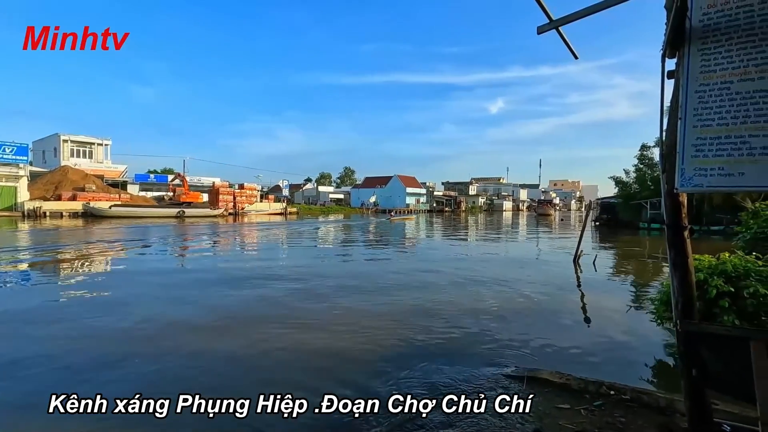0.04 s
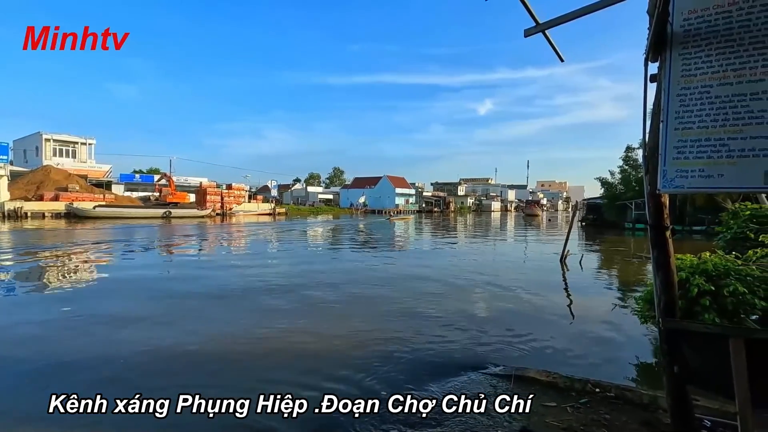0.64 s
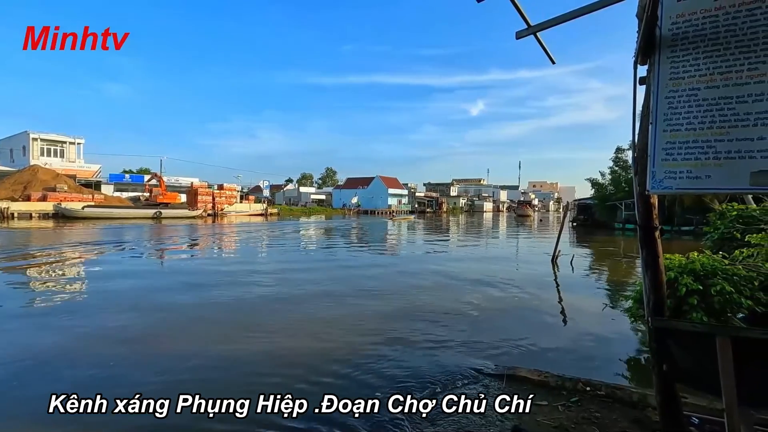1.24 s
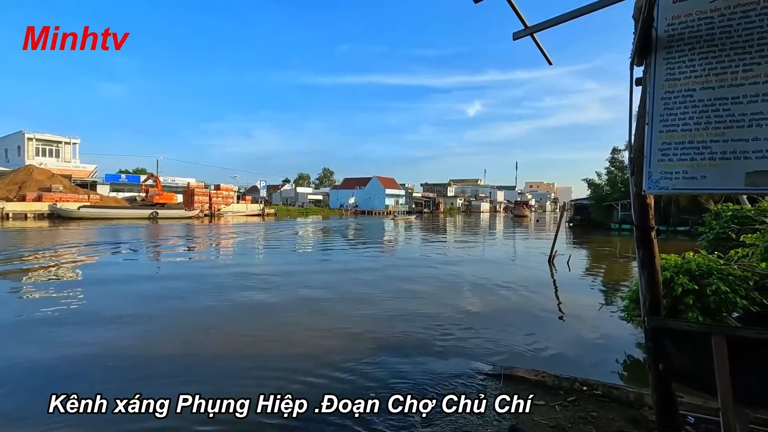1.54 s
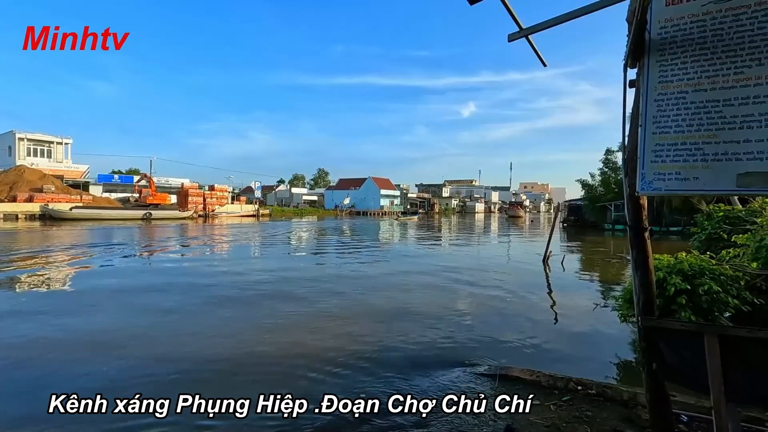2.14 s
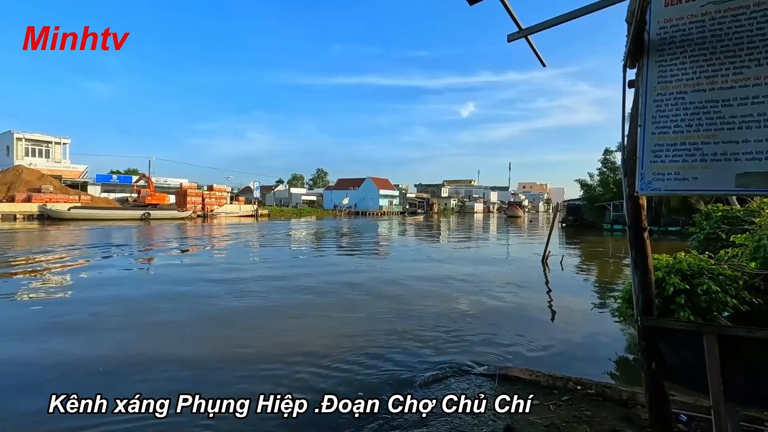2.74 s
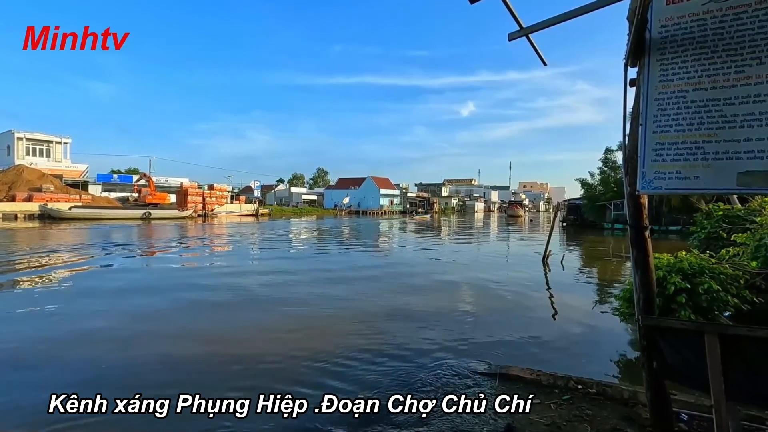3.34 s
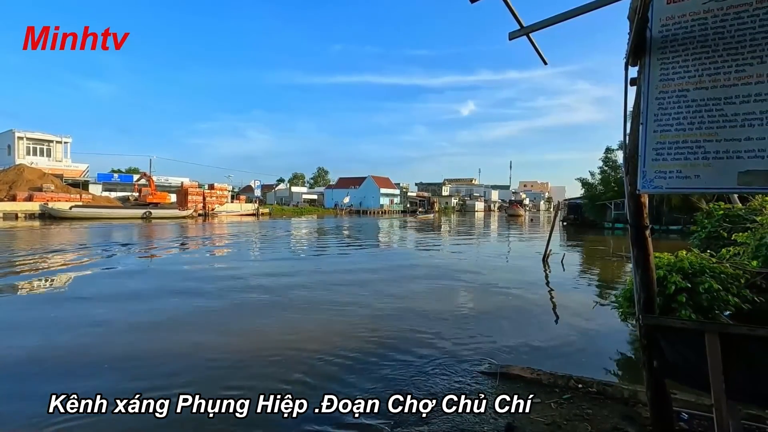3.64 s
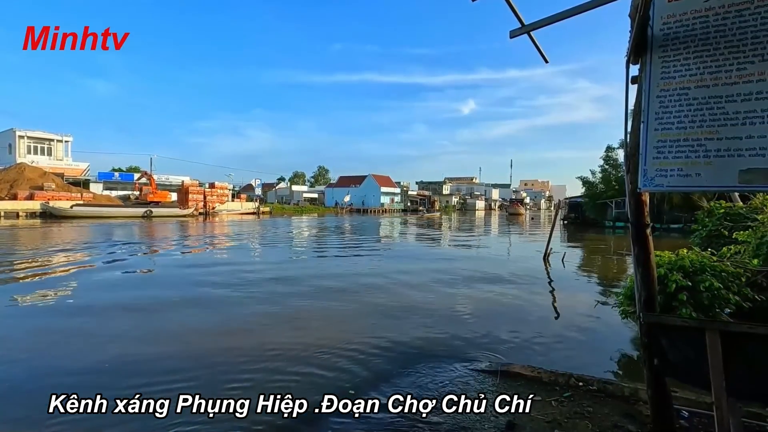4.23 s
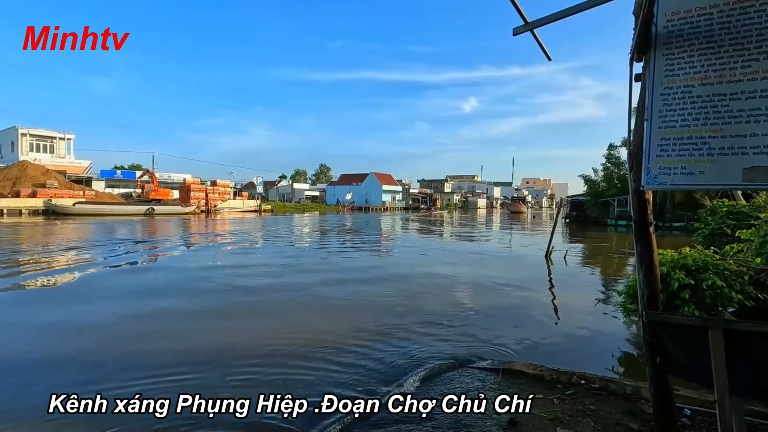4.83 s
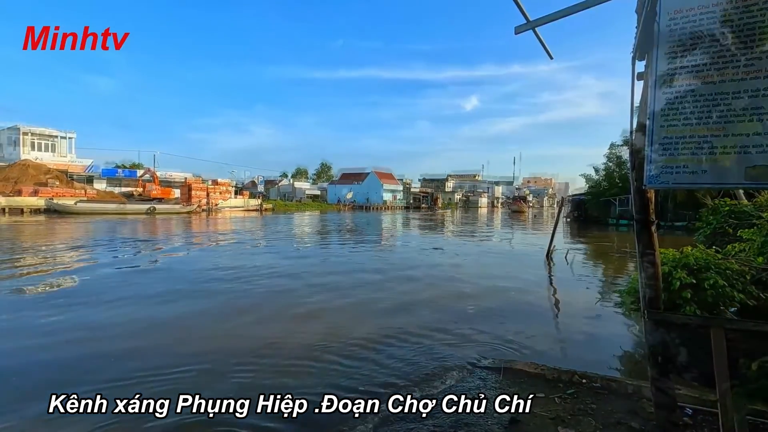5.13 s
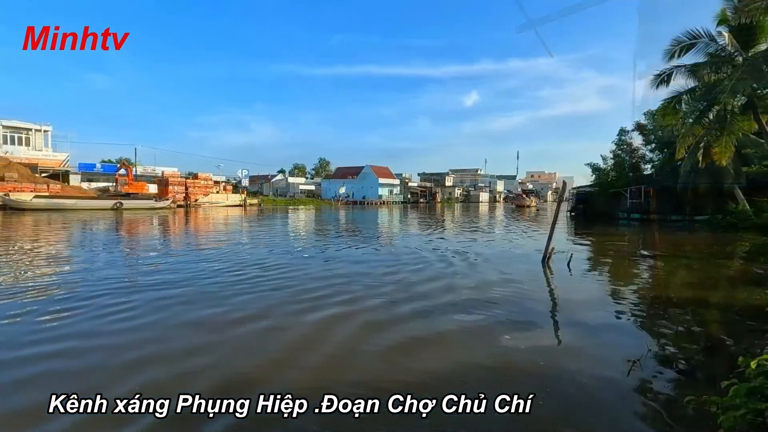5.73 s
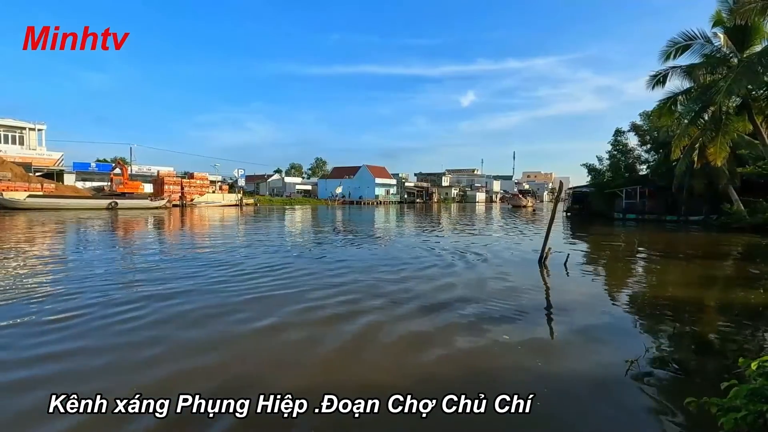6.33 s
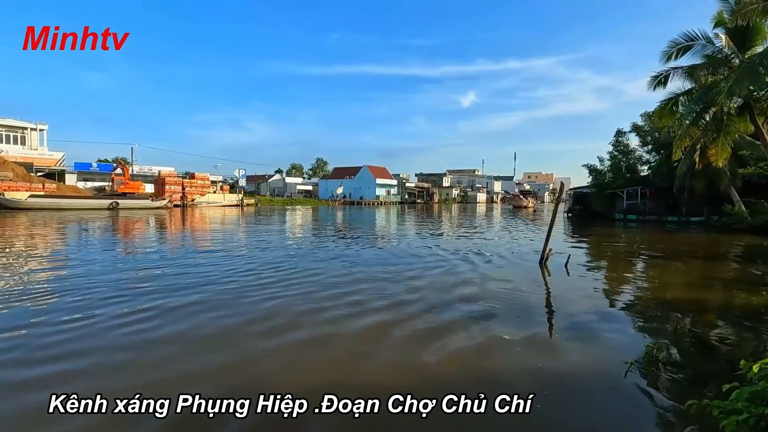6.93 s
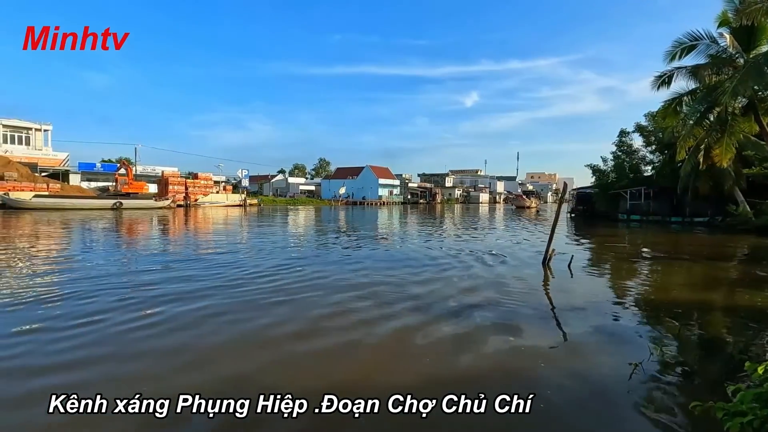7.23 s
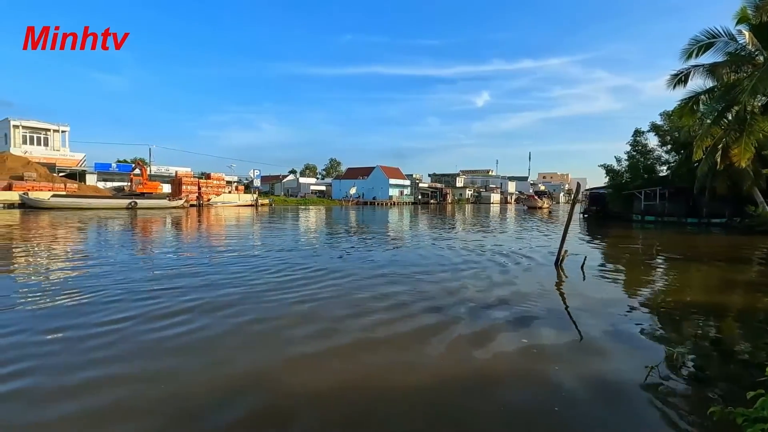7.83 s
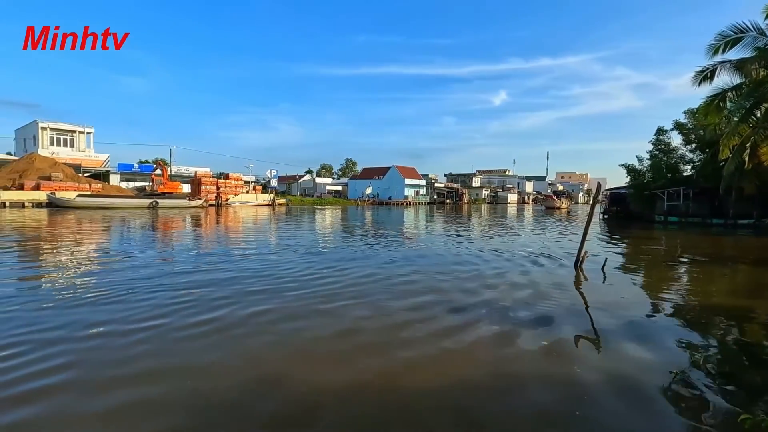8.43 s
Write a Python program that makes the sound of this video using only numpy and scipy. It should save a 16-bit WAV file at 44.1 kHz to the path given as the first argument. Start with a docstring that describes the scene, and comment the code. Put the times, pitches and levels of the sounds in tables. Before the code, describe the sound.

A small boat engine chugs close by on the water, cuts off abruptly, then a duller, quieter chugging fades in.

```python
"""A single-cylinder boat engine chugs close by, about twenty firings a second.
Each firing excites an exhaust thump, a bark in the pipe, a crack of gas and the modes of the casing.
Water washes the hull, wind rumbles, a bird gives one three-note chirp and waves slap.
The sound cuts off at 5.3 s; a duller, quieter chugging fades in and swells over wind and water,
with a few faint tones and more waves. Pulses and noise drive filters that stand for each body."""
import sys
import numpy as np
from scipy import signal
from scipy.fft import rfft, irfft, next_fast_len
from scipy.io import wavfile
from scipy.ndimage import map_coordinates

SR = 44100
rng = np.random.default_rng(int(sys.argv[2]) if len(sys.argv) > 2 else 0)


def waveform_to_disk(signal):
    """Save audio, clipped to [-1, 1], as 16-bit WAV at the path in sys.argv[1]."""
    frames = np.transpose(np.atleast_2d(signal))
    scaled = np.clip(frames, -1, 1) * 32767
    samples = np.round(scaled).astype(np.int16)
    wavfile.write(sys.argv[1], SR, samples)


N = 377937
TIME = np.arange(N) / SR
BOAT_ECHO_S, BANK_ECHO_S = .00733, .0155
VALVE_LEAD_S = .0019  # the near exhaust valve opens this long before each firing time

# Levels in the tables are relative: each layer may have a further gain.
# crank speed, steady nearby, sagging and recovering far off: time_s, firings_per_s
NEAR_SPEED = [(.1, 20.45), (.25, 20.36), (1.05, 20.36), (1.45, 20.49), (1.65, 20.40), (2.2, 20.49),
              (2.9, 20.46), (3.45, 20.29), (3.7, 20.44), (3.95, 20.34), (4.4, 20.41), (4.85, 20.41),
              (5.1, 20.30)]
FAR_SPEED = [(5.94, 19.83), (6.54, 17.675), (7.117, 19.188)]
# harmonics of the exhaust thump: multiple_of_firing_rate, level_db
NEAR_HARMONICS = [(1, -21), (2, -16), (3, -8), (4, -15), (5, -11), (6, 0), (7, -1.3), (8, -2.5), (9, -4.5),
                  (10, -10), (11, -7), (12, -7), (13, -11), (14, -12), (15, -15), (16, -17), (17, -35),
                  (18, -24), (19, -15), (20, -13), (21, -22), (22, -28)]
FAR_HARMONICS = [(1, -31), (2, -10), (3, -12), (4, -10), (5, -1), (6, -2.5), (7, -6), (8, -3.5), (9, -4.5),
                 (10, -5), (11, -5), (12, -5.5), (13, -9), (14, -5), (15, -7), (16, -9.5), (17, -5),
                 (18, -8.5), (19, -6.5), (20, -5), (21, -5.5), (22, -27)]
# all-pass resonances of the pipe: centre_hz, width_hz
PIPE_RESONANCES = [(300, 150), (400, 150)]
# spectra of the near exhaust's sounds, from low to high: frequency_hz, level_db
CHURN_SPECTRUM = [(30, -14), (60, -18), (78, -8), (100, 1.5), (150, -4.5), (240, -4.5), (310, -10.5),
                  (360, -12), (405, -11.5), (470, -25.5), (900, -33.5)]
KNOCK_SPECTRUM = [(460, -17.5), (560, -1), (780, -0.5), (865, -8), (930, 0.5), (1050, 1), (1500, -13.5)]
BARK_SPECTRUM = [(350, -20.5), (470, -26), (560, -13), (780, -8.5), (850, -13.5), (950, -7), (1300, 0.5),
                 (1600, -13.5), (1850, -10.5), (2400, -11.5), (5000, -42)]
POP_SPECTRUM = [(1450, -10.5), (1780, -1), (2050, -8.5), (2290, 0.5), (2530, -15), (2780, 3), (3000, -18)]
CRACK_SPECTRUM = [(1700, -7), (2100, -18.5), (2500, -12), (2900, -2), (3400, -1), (4100, -6), (4900, -1),
                  (5600, -4.5), (6400, -13), (7300, -11), (8500, -19), (11000, -27), (13500, -48.5),
                  (15500, -63)]
SPIT_SPECTRUM = [(5500, -13), (7400, 2.5), (8600, -6.5), (11000, -8.5), (13500, -23), (15500, -35.5)]
# spits of the hardest firings: start_s, level_db
HARD_SPITS = [(0.1887, -25), (0.6799, -25.5), (3.0285, -27), (3.0774, -26), (3.1263, -30), (3.421, -26),
              (3.9614, -27), (4.1586, -19.5), (4.502, -25), (4.8439, -23), (5.1875, -19.5), (5.2869, -26)]
# modes of the pipe mouth and of the casing: pitch_hz, width_hz, level_db
MOUTH_MODES = [(3000, 850, -18), (3560, 99, -14.5), (4060, 440, -9), (4850, 280, -8.5), (5544, 400, -10),
               (7040, 350, -15.5)]
CASING_MODES = [(538, 47, -45.5), (612.5, 22, -54.5), (653, 14, -49.5), (696, 24, -48), (774.5, 13, -48),
                (817, 9.5, -48), (914, 49, -46), (1029, 40, -45.5), (1108, 52, -47.5), (1255, 43, -41.5),
                (1357, 35, -48), (1428, 13, -55.5), (1482, 14, -50.5), (1630, 40, -51), (1778, 83, -45),
                (3460, 150, -54)]
# valve-gear taps after each firing: delay_s, level_db
VALVE_TAPS = [(.0195, -20.5), (.028, -18), (.0387, -14.5), (.0452, -13.5)]
# transmission of a blow into the casing: frequency_hz, level_db
MOUNT_SPECTRUM = [(440, -20), (540, 0), (1400, 0), (1800, -7), (3500, -20)]
# strength of the casing's singing mode: time_s, level_db
SINGING_LEVEL = [(0, -39), (1.2, -40.5), (2.2, -37), (3.0, -39.5), (3.5, -42.5), (4.5, -44)]
# loose metal parts: pitch_hz, level_db
LOOSE_PARTS = [(1900, -49), (2300, -51.5), (3150, -51.5), (3550, -51.5), (4250, -51.5), (4850, -51),
               (5350, -51.5), (6300, -55), (7200, -55)]
# the boat's slight drift to the right: time_s, left_minus_right_db, crack_db, wash_db
NEAR_DRIFT = [(0, 0.2, -0.5, -1.2), (1.2, 0, 1, -3), (2.4, 0, -1, -0.5), (3.6, -0.5, 0.4, -0.5),
              (4.5, -.6, -.7, -1.4), (5.3, -1.5, 0, 0)]
# coherence of the near noise between the ears: frequency_hz, coherence_ratio
EAR_COHERENCE = [(200, 0.1), (450, 0.42), (1000, 0.64), (2200, 0.6), (5000, 0.74), (8000, 0.4),
                 (13000, 0.4)]
# spectra of water on the hull, wind and waves: frequency_hz, level_db
WASH_SPECTRUM = [(450, -4), (650, -3), (850, -6), (950, -1.5), (1300, -2.5), (1600, -4.5), (2300, -12.5),
                 (3300, -10), (4200, -14), (5300, -13.5), (7200, -17), (8500, -20.5), (11000, -25.5),
                 (13500, -33), (15500, -51.5)]
WIND_SPECTRUM = [(8, -12.5), (18, -6.5), (27, -5.5), (45, -1.5), (70, -4), (110, -16.5), (300, -54)]
WAVE_SPECTRUM = [(500, 1.5), (800, 1.5), (1400, 1.5), (1800, -6.5), (2400, -8), (3200, -14.5)]
# bird notes and faint distant tones: start_s, length_s, start_hz, end_hz, level_db, octave_db
BIRD_NOTES = [(1.722, .07, 2950, 3000, -39.5, -14), (1.78, .065, 2980, 3130, -35, -12),
              (1.872, .04, 5500, 5390, -33.5, -35)]
FAR_TONES = [(6.05, .22, 510, 520, -63, -8), (6.15, .28, 930, 870, -64, -20),
             (6.4, .55, 471, 466, -60, -12), (7.8, .05, 4300, 4260, -58, -35),
             (7.86, .06, 2380, 2430, -56, -35)]
# waves against the hull: peak_s, level_db, cutoff_hz
WAVE_SLAPS = [(4.91, -30.5, 1500), (5.08, -35, 1600), (7.70, -45, 2100), (7.78, -44, 2070),
              (7.88, -40.5, 2700)]
# spectra of the muffled engine and its water: frequency_hz, level_db
FAR_CHURN_SPECTRUM = [(30, -3), (70, -7), (100, 1), (150, -2.5), (205, -3.5), (245, -4), (290, -16),
                      (390, -13), (430, -26), (900, -51)]
FAR_WASH_SPECTRUM = [(200, -4.5), (450, -7), (540, -2.5), (650, 1), (1000, -3), (1600, -9), (2200, -15.5),
                     (3200, -15), (4500, -34), (8000, -56)]
TICK_SPECTRUM = [(1000, -11), (1600, -2), (2100, -7), (2700, -2.5), (3300, -1), (4000, -13), (5000, -16),
                 (6500, -23), (8000, -24), (10500, -34), (14000, -55)]
HISS_SPECTRUM = [(1500, -5), (3200, 4.5), (4400, 5), (6000, 0.5), (8000, -5.5), (10000, -12), (11500, -19),
                 (13000, -15), (15500, -30)]
# harder ticks of the muffled engine: start_s, level_db
HARD_TICKS = [(5.7955, -36), (5.846, -42), (6.2045, -43), (6.3675, -38), (6.645, -39), (6.7565, -35),
              (6.8115, -32.5), (6.972, -31), (7.286, -30), (7.339, -32.5), (8.328, -30)]
# strength of its hiss, sinking and then rising: time_s, level_db
HISS_LEVEL = [(5.75, -66.5), (6.1, -68.5), (6.45, -69.5), (6.62, -69.5), (6.85, -61.5), (7.3, -59.5),
              (7.8, -56.5), (8.55, -51.5)]


def from_db(db):
    """Amplitude ratio: tenfold for every 20 dB."""
    return 10 ** (np.asarray(db) / 20)


def rms_one(x):
    """Normalisation to unit mean power."""
    return x / np.sqrt(np.mean(x ** 2) + 1e-20)


def at_level(db, x, times):
    """Normalisation to an rms level between the first and last firing."""
    running = x[..., int(times[0] * SR):int(times[-1] * SR)]
    return from_db(db) * x / np.sqrt(np.mean(running ** 2))


def at_hz(points, hz):
    """Interpolation on a logarithmic frequency axis."""
    known_hz, value = np.transpose(points)
    return np.interp(np.log(hz + 1e-3), np.log(known_hz), value)


def over_time(points):
    """Linear interpolation in time."""
    return np.interp(TIME, *np.transpose(points))


def colour(x, spectrum, size=8192):
    """Minimum-phase filtering to a spectrum that falls away past both ends; unit power."""
    hz = np.arange(size // 2 + 1) * SR / size + 1
    octaves_out = np.maximum(np.log2(spectrum[0][0] / hz), 0) + np.maximum(np.log2(hz / spectrum[-1][0]), 0)
    cepstrum = irfft(np.log(from_db(at_hz(spectrum, hz) - 18 * np.minimum(octaves_out, 3))))
    cepstrum[1:size // 2] *= 2  # folding the cepstrum makes the filter causal
    cepstrum[size // 2 + 1:] = 0
    response = irfft(np.exp(rfft(cepstrum)))
    return rms_one(signal.oaconvolve(np.atleast_2d(x), response[None], axes=1)[:, :N])


def poles(hz, width_hz):
    """Pole pair of a damped oscillator: the wider the band, the faster the decay."""
    radius = np.exp(-np.pi * width_hz / SR)
    return [1, -2 * radius * np.cos(2 * np.pi * hz / SR), radius * radius]


def resonate(x, hz, width_hz):
    """Forced response of one damped mode."""
    return signal.lfilter([1, 0, -1], poles(hz, width_hz), x)


def muffle(x, top_hz):
    """Low-pass attenuation of the treble."""
    return signal.sosfilt(signal.butter(4, top_hz, fs=SR, output="sos"), x)


def noise():
    """White noise, fully coherent between the ears."""
    return rng.standard_normal(N)


def wide_noise():
    """White stereo noise whose coherence depends on frequency."""
    size = next_fast_len(N + N % 2, real=True)
    mid, side = rfft(rng.standard_normal((2, size)))
    coherence = np.clip(at_hz(EAR_COHERENCE, np.arange(len(mid)) * SR / size), 0, 1)
    return irfft(np.sqrt(1 + coherence) * mid + np.sqrt(1 - coherence) * side * [[1], [-1]])[:, :N]


def flutter(per_s, depth_db):
    """Random amplitude modulation."""
    knots = rng.standard_normal(4000)
    return from_db(depth_db * np.interp(TIME * per_s, np.arange(len(knots)), knots))


def pan(db):
    """Interaural level difference; positive favours the left."""
    return from_db(np.vstack([db / 2, -db / 2]))


def off_centre(x, lag_s, pan_db):
    """Interaural time and level differences; the left ear lags."""
    left = map_coordinates(x[0], [np.arange(N) - lag_s * SR], order=3)
    return np.array([left, x[-1]]) * pan(pan_db)


def firings(speed, first_s, jitter_s):
    """Integrating the firing rate counts cycles; each whole cycle fires, with slight jitter."""
    cycles = np.cumsum(over_time(speed)) / SR
    cycles -= np.interp(first_s, TIME, cycles)
    times = np.interp(np.arange(int(cycles[-1]) + 1), cycles, TIME)
    return times + jitter_s * rng.standard_normal(len(times))


def clicks(times, spread_db):
    """Impulse train of randomly varying strength."""
    train = np.zeros(N)
    samples = np.clip(np.round(times * SR).astype(int), 0, N - 1)
    train[samples] = from_db(spread_db * rng.standard_normal(len(times)))
    return train


def strikes(rows):
    """Impulses of given time and strength."""
    start_s, level_db = np.transpose(rows)
    train = np.zeros(N)
    train[np.round(start_s * SR).astype(int)] = from_db(level_db)
    return train


def puffs(train, rise_s, fall_s, size=2600):
    """Convolution gives each impulse a smooth rise and an exponential decay."""
    age = np.arange(size) / SR
    shape = (1 - np.exp(-(age / rise_s) ** 2)) * np.exp(-age / fall_s)
    return signal.oaconvolve(train, shape / shape.max())[:N]


def turbulence(times, memory, size=2600):
    """Noise that partly repeats from cycle to cycle gathers into wavering harmonics."""
    fresh = rng.standard_normal((len(times) + 1, size))
    renewal = np.sqrt(1 - memory ** 2)
    cycles, _ = signal.lfilter([renewal], [1, -memory], fresh[1:], axis=0, zi=memory * fresh[:1])
    cycle = np.maximum(np.searchsorted(times, TIME) - 1, 0)
    age_samples = np.round((TIME - times[cycle]) * SR).astype(int)
    return cycles[cycle, age_samples % size]


def wash(gain_db):
    """Water on the hull: broadband noise under fast random modulation."""
    return from_db(gain_db) * colour(wide_noise() * flutter(per_s=300, depth_db=4), WASH_SPECTRUM)


def wind():
    """Gusts are low-frequency pressure fluctuations, mostly common to both ears."""
    air = noise() + from_db(-19.5) * rng.standard_normal((2, N))
    return from_db(-35) * colour(air * flutter(per_s=4.7, depth_db=1.5), WIND_SPECTRUM)


def jingle():
    """Free vibration: each loose part rings briefly after random taps."""
    taps_per_s, rings = 60, 0
    for hz, db in LOOSE_PARTS:
        taps = (rng.random(N) < taps_per_s / SR) * (noise() + .5 * rng.standard_normal((2, N)))
        rings = rings + from_db(db) * rms_one(resonate(taps + 1e-18, hz, width_hz=65))
    return rings


def thump(times, harmonics, spread_db):
    """Periodic pulses swing the air in the pipe; group delay holds back its hollow notes."""
    firing_hz = 1 / np.mean(np.diff(times))
    pressure = colour(clicks(times, spread_db), [(k * firing_hz, db) for k, db in harmonics])
    for hz, width_hz in PIPE_RESONANCES:
        feedback = poles(hz, width_hz)
        pressure = signal.lfilter(feedback[::-1], feedback, pressure)
    return pressure


def exhaust_bass(times, opening):
    """Pulsating flow: a harmonic thump over low turbulent churning."""
    thumps = at_level(-2, thump(times - .0006, NEAR_HARMONICS, spread_db=.46), times)
    flow = turbulence(opening, memory=.5) * (1 + .3 * puffs(clicks(opening, 1), .001, .005))
    return thumps + from_db(-7.8) * colour(flow, CHURN_SPECTRUM)


def hull_hum(times, opening):
    """Forced vibration: the thumps drive one narrow mode of the hull."""
    blows = clicks(opening + BOAT_ECHO_S + .0012, .68)
    return at_level(-53, resonate(blows, hz=408, width_hz=14), times)


def pipe_bark(times, opening, gas_flow):
    """The pipe's resonances colour each pulse and its echo as a knock, their gas puffs as a bark."""
    pulses = clicks(opening + .0002, .5) + from_db(-13) * clicks(opening + BOAT_ECHO_S, 1)
    knock = colour(pulses, KNOCK_SPECTRUM)
    bark = colour(gas_flow * puffs(pulses, .00023, .0027), BARK_SPECTRUM)
    return at_level(-14.5, knock, times) + at_level(-14.5, bark, times)


def gas_crack(times, opening, jet):
    """Jet noise cracks, reflects weakly off the boat and is followed by a mid-cycle valve tick."""
    echo = from_db(-13.5) * puffs(clicks(opening + BOAT_ECHO_S, 1.5), rise_s=.0012, fall_s=.002)
    mid_cycle = (opening[1:] + opening[:-1]) / 2
    valve = from_db(-18.5) * puffs(clicks(mid_cycle + .0008, 2.5), rise_s=.001, fall_s=.0015)
    return at_level(-2.5, colour(wide_noise() * (jet + echo + valve), CRACK_SPECTRUM), times)


def gas_spit(times, opening):
    """High-frequency jet noise edges each crack, most of all on the hardest firings."""
    pulses = clicks(opening - .001, 3) + from_db(-11) * clicks(opening + BOAT_ECHO_S, 2)
    spurts = wide_noise() * puffs(pulses, rise_s=.004, fall_s=.0012)
    regular = at_level(-16, colour(spurts, SPIT_SPECTRUM), times)
    bursts = from_db(30) * puffs(strikes(HARD_SPITS), rise_s=.001, fall_s=.0014)
    return regular * pan(3) + bursts * colour(wide_noise(), SPIT_SPECTRUM) * pan(4)


def gas_pop(times):
    """A band-limited noise burst and its reflection lie between bark and crack."""
    pulses = clicks(times - .0009, 1.2) + from_db(-8) * clicks(times + BOAT_ECHO_S, 2)
    bursts = noise() * puffs(pulses, rise_s=.0008, fall_s=.00088)
    return at_level(-12.5, colour(bursts, POP_SPECTRUM), times) * pan(-3)


def ring_modes(drive, modes, times, per_s, depth_db):
    """Modal superposition, with the drive to each mode wandering at random."""
    return sum(at_level(db, resonate(drive * flutter(per_s, depth_db), hz, width_hz), times)
               for hz, width_hz, db in modes)


def pipe_mouth(times, opening):
    """The escaping jet radiates noise and excites a changing mix of the mouth's modes."""
    jet = puffs(clicks(opening + .0002, .6), rise_s=.003, fall_s=.0006)
    gas = gas_crack(times, opening, jet) + gas_spit(times, opening) + gas_pop(times)
    blast = colour(wide_noise() * jet, CRACK_SPECTRUM)
    return gas + ring_modes(blast, MOUTH_MODES, times, per_s=20, depth_db=2.3)


def casing(times, opening, gas_flow):
    """Structure-borne sound: firings, valve taps and rattling drive the casing's modes."""
    taps = sum(from_db(db) * clicks(times + delay_s, 2.2) for delay_s, db in VALVE_TAPS)
    blows = colour(clicks(opening, .6) + taps, MOUNT_SPECTRUM)
    rattle = colour(gas_flow * (.098 + puffs(clicks(opening, 1.2), .00052, .0027)), BARK_SPECTRUM)
    shake = blows + from_db(-8) * rattle
    singing = at_level(over_time(SINGING_LEVEL), resonate(shake, hz=1390, width_hz=9.8), times)
    return ring_modes(shake, CASING_MODES, times, per_s=9, depth_db=1.8) + singing


def near_engine():
    """Superposition of the close engine, water and wind, with interaural cues for each band."""
    drift_s, *drift = np.transpose(NEAR_DRIFT)
    pan_db, crack_db, wash_db = (np.interp(TIME, drift_s, column) for column in drift)
    exhaust_gain, gas_gain = from_db(-24), from_db(-33.5 + crack_db)
    times = firings(NEAR_SPEED, first_s=.0432, jitter_s=.00005)
    opening = times - VALVE_LEAD_S
    bass = exhaust_gain * exhaust_bass(times, opening) + hull_hum(times, opening)
    gas_flow = turbulence(opening, memory=.6) + .6 * wide_noise()
    body = exhaust_gain * pipe_bark(times, opening, gas_flow) + casing(times, opening, gas_flow)
    top = gas_gain * pipe_mouth(times, opening) + wash(-34 + wash_db) + jingle()
    boat = (off_centre(bass, lag_s=.00008, pan_db=.6) + off_centre(body, lag_s=.00009, pan_db=3)
            + off_centre(top, lag_s=.00001, pan_db=.5))
    return boat * pan(pan_db) + wind()


def whistles(notes):
    """Gliding tones with a weak second harmonic, wavering by amplitude modulation."""
    tones = np.zeros(N)
    for start_s, length_s, start_hz, end_hz, db, octave_db in notes:
        along = np.clip((TIME - start_s) / length_s, 0, 1)
        phase = 2 * np.pi * np.cumsum(start_hz + (end_hz - start_hz) * along) / SR
        envelope = from_db(db) * np.sqrt(8 * along * (1 - along))
        tones += envelope * (np.sin(phase) + from_db(octave_db) * np.sin(2 * phase))
    return tones * flutter(per_s=130, depth_db=2.5)


def wave_slaps(rise_s=.045, fall_s=.071):
    """Each wave's noise grows and drains exponentially; splashier ones have more bandwidth."""
    water = colour(noise() * flutter(per_s=140, depth_db=2.5), WAVE_SPECTRUM)
    slaps = 0
    for peak_s, db, top_hz in WAVE_SLAPS:
        envelope = from_db(db) * np.exp(np.minimum((TIME - peak_s) / rise_s, (peak_s - TIME) / fall_s))
        slaps = slaps + envelope * muffle(water, top_hz)
    return slaps


def swell(start_s, before_db, end_db, bend):
    """A steady level, then power-law growth in decibels; a bend under 1 rises early."""
    along = np.clip((TIME - start_s) / (TIME[-1] - start_s), 0, 1)
    return from_db(before_db + (end_db - before_db) * along ** bend)


def reverberate(train, fall_s, tail_db, size=2200):
    """Convolution with decaying noise gives every impulse the same dense ring."""
    decay = np.exp(-np.arange(size) / SR / fall_s) + from_db(tail_db)
    return signal.oaconvolve(train, rng.standard_normal(size) * decay)[:N]


def far_exhaust(times, opening, gas_flow):
    """Thumps and turbulent churning, smeared by multiple reflections from the banks."""
    thumps = at_level(-3, thump(opening, FAR_HARMONICS, spread_db=.8), times)
    echoes = reverberate(clicks(opening, .85), fall_s=.049, tail_db=-22.5)
    banks = at_level(-9, colour(echoes, FAR_CHURN_SPECTRUM), times)
    churn = from_db(-.6) * colour(noise() + .7 * gas_flow, FAR_CHURN_SPECTRUM)
    return thumps + banks + churn


def far_knock_and_wash(times, opening, gas_flow):
    """Each knock reflects off the bank and reverberates in a wash of the same spectrum."""
    blows = clicks(opening - .0003, 1.5) + from_db(-5) * clicks(opening + BANK_ECHO_S, 2)
    knock = muffle(colour(blows, FAR_WASH_SPECTRUM), top_hz=1710)
    ring = colour(reverberate(clicks(opening, .71), fall_s=.0069, tail_db=-2), FAR_WASH_SPECTRUM)
    water = colour((noise() + gas_flow) * flutter(per_s=150, depth_db=2.5), FAR_WASH_SPECTRUM)
    return at_level(-7.5, knock, times) + at_level(-5.5, ring, times) + from_db(-.8) * water


def far_ticks(times):
    """Noise bursts tick and excite damped resonances, whose treble is lost to distance."""
    tick = colour(noise() * puffs(clicks(times - .001, 1.3), .0007, .0025), TICK_SPECTRUM)
    clink = resonate(noise() * puffs(clicks(times - .001, 1.2), .0008, .0018), hz=3150, width_hz=300)
    hard = resonate(noise() * puffs(strikes(HARD_TICKS), .00055, .0017), hz=3120, width_hz=550)
    regular = at_level(-3.5, tick, times) + muffle(at_level(-9.5, clink, times), top_hz=4200)
    return swell(6.5, -63.5, -51.5, bend=.4) * regular + from_db(-23) * muffle(hard, top_hz=3800)


def far_hiss(opening):
    """Treble noise, amplitude-modulated at the firing rate."""
    pulsing = 1 + .78 * puffs(clicks(opening, 1), .0012, .0042)
    return from_db(over_time(HISS_LEVEL)) * colour(noise() * pulsing, HISS_SPECTRUM)


def far_boom(times, gas_flow, hz=203, width_hz=27):
    """Turbulence drives a low resonance of the hull, which grows towards the end."""
    boom = resonate(resonate(gas_flow, hz, width_hz), hz, width_hz)
    return swell(7.5, -67, -31.5, bend=.5) * at_level(0, boom, times)


def far_engine():
    """Superposition of the muffled engine, water and wind, in mono: the same in both ears."""
    times = firings(FAR_SPEED, first_s=5.5438, jitter_s=.0001)
    opening = times - .0012
    gas_flow = turbulence(opening, memory=.6)
    exhaust = swell(6.5, -45.5, -29.5, bend=.72) * far_exhaust(times, opening, gas_flow)
    water = swell(6.5, -54.5, -38.5, bend=.81) * far_knock_and_wash(times, opening, gas_flow)
    gusts = swell(7, -56, -33.5, bend=.5) * colour(noise(), WIND_SPECTRUM)
    return exhaust + water + gusts + far_ticks(times) + far_hiss(opening) + far_boom(times, gas_flow)


def scene():
    """Amplitude gating: the near scene cuts off, and after a gap the muffled one fades in."""
    cut_s, fade_start_s, fade_end_s = 5.325, 5.46, 5.75
    cut = np.clip((cut_s - TIME) / .002, 0, 1)
    fade = np.clip((TIME - fade_start_s) / (fade_end_s - fade_start_s), 0, 1) ** 1.67
    waves = wave_slaps()
    near = near_engine() + whistles(BIRD_NOTES) + waves
    far = far_engine() + whistles(FAR_TONES) + waves
    return cut * near + fade * far


def record(dry):
    """Soft saturation rounds the highest peaks; a steep low-pass limits the bandwidth."""
    ceiling, cutoff_hz = .6, 15800
    rounded = dry / (1 + (dry / ceiling) ** 4) ** .25
    return signal.sosfilt(signal.ellip(10, .1, 80, cutoff_hz, fs=SR, output="sos"), rounded)


dry = scene()
out = record(dry)
waveform_to_disk(out)
```